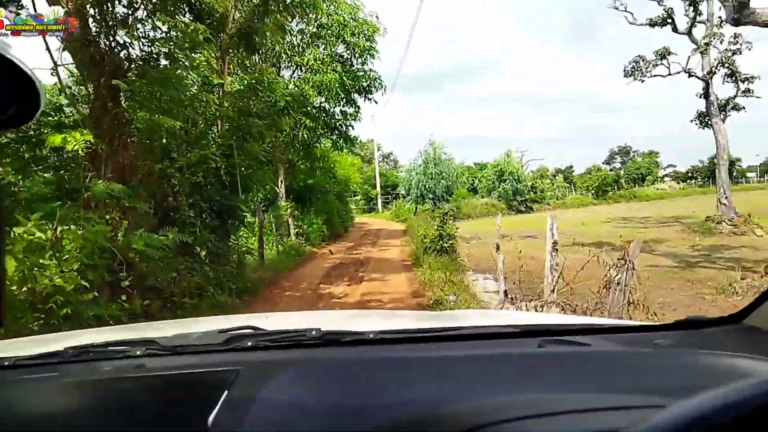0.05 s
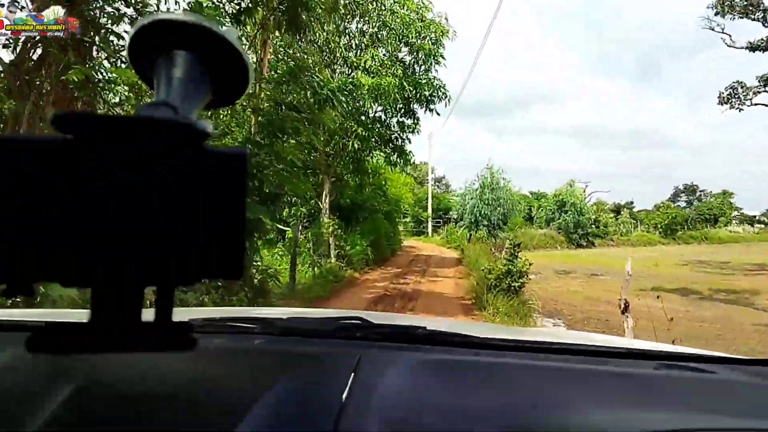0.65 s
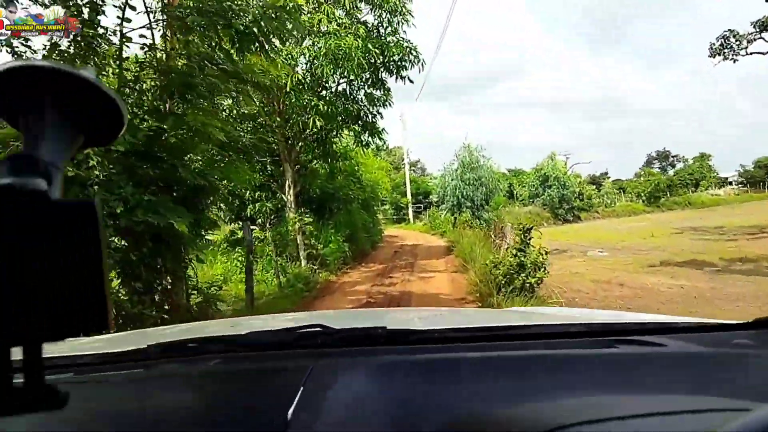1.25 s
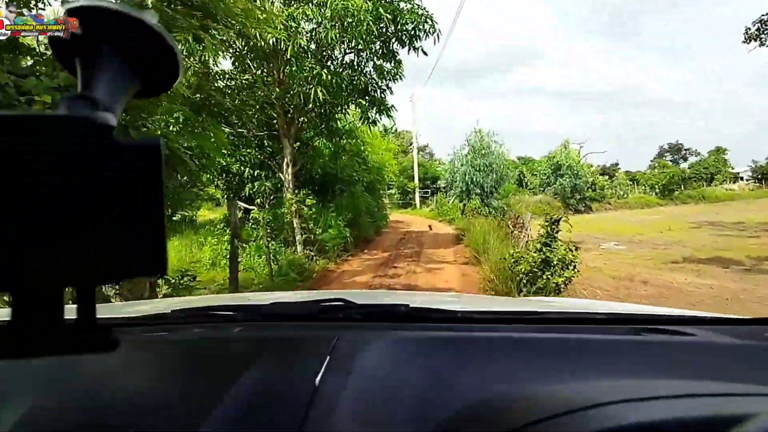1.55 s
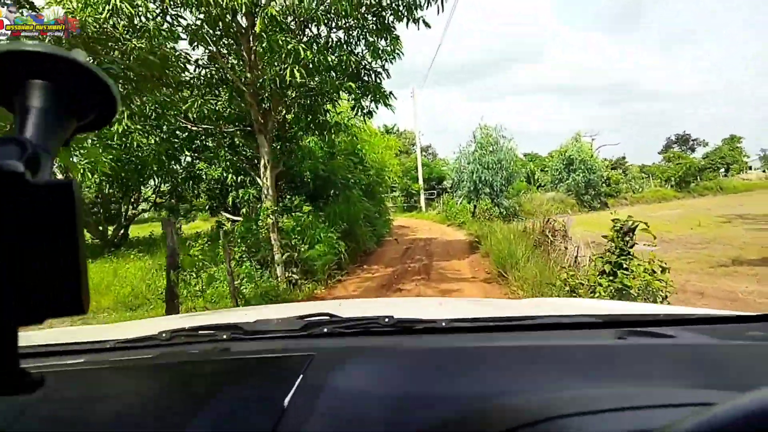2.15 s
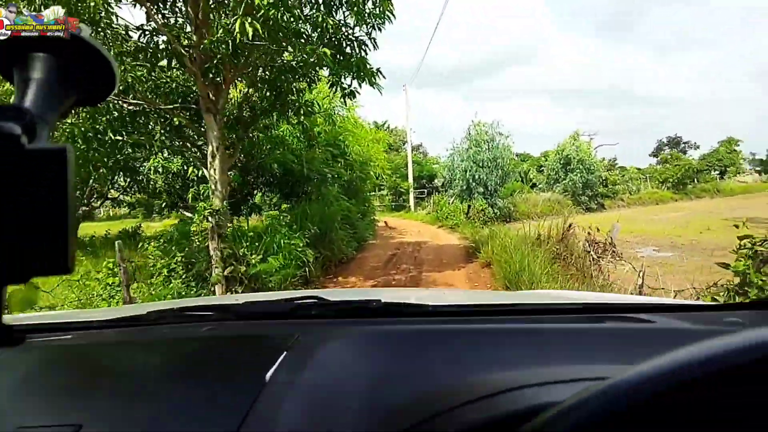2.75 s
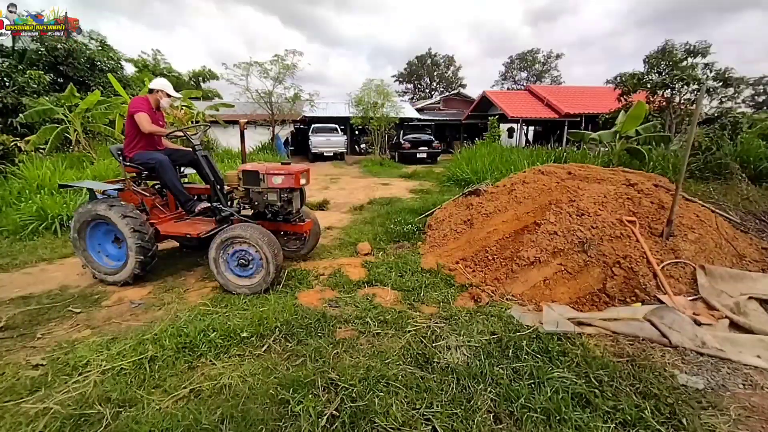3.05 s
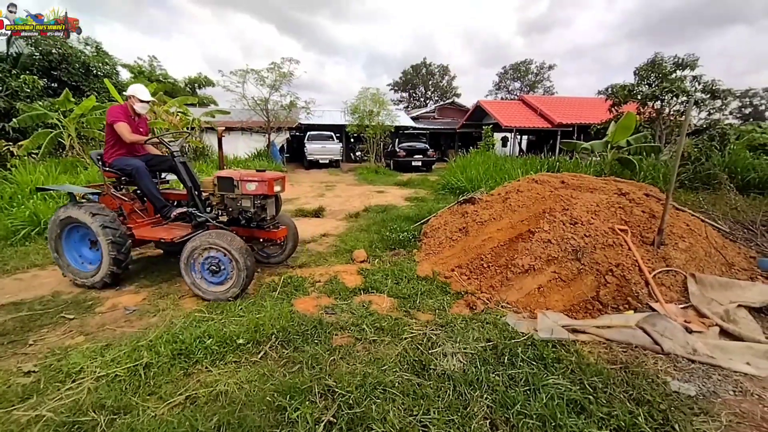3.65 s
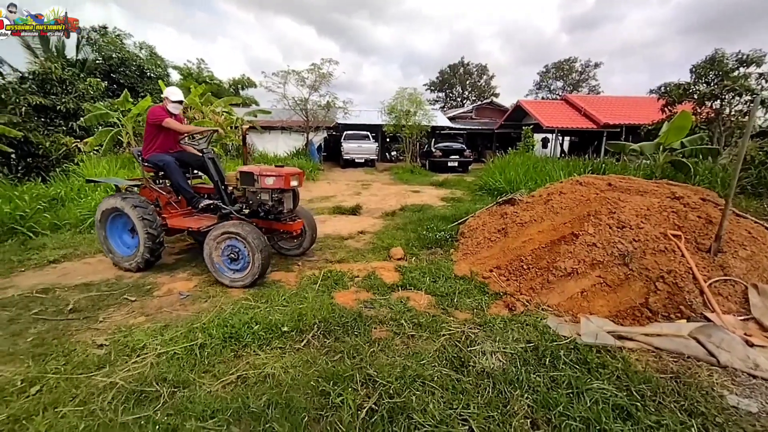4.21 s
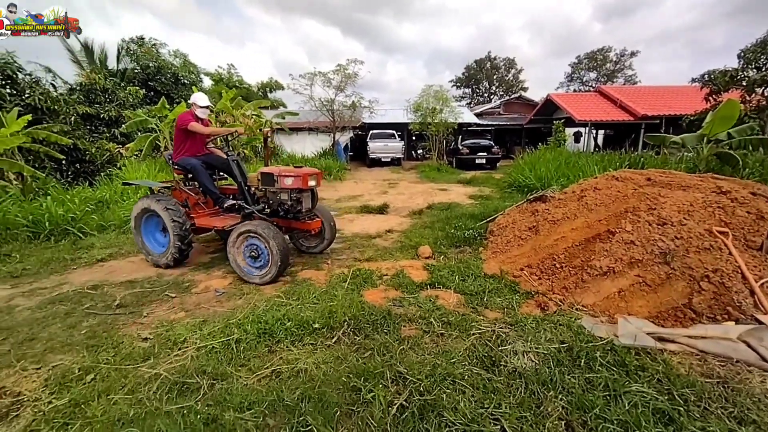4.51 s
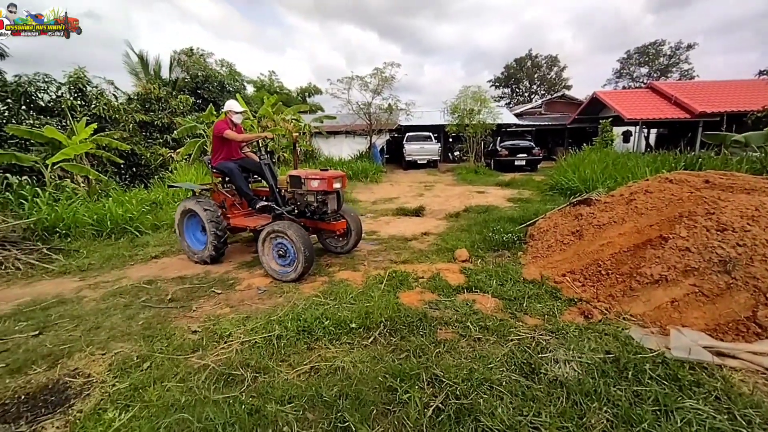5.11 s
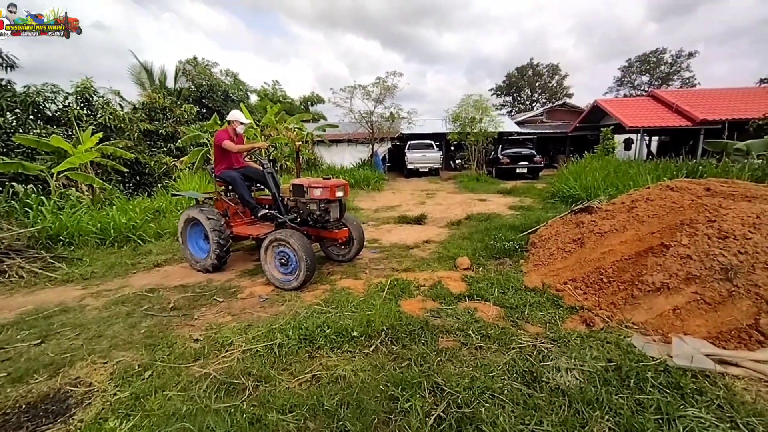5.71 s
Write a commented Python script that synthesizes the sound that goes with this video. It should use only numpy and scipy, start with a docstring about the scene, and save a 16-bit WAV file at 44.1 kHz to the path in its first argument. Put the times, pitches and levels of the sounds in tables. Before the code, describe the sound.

A low rumble inside a car on a dirt road, then a small diesel tractor revs and slows, thudding and rattling.

```python
"""A car ride, then a tractor

Inside a car creeping along a dirt road, the tyres rumble, the engine hums and the trim ticks.
After a short silence, a small one-cylinder diesel tractor revs up and sinks back to idle outdoors.
Each engine cycle brings an exhaust thud, an intake boom, valve clicks and a firing, which knocks
under full throttle. Loose panels rattle, fittings clink and the slipping belt chirps."""
import sys
import numpy as np
from scipy import signal
from scipy.fft import rfft, irfft, next_fast_len
from scipy.io import wavfile
from scipy.ndimage import uniform_filter1d, map_coordinates

SR = 44100
rng = np.random.default_rng(int(sys.argv[2]) if len(sys.argv) > 2 else 0)


def wav_out(sig):
    """Save sig, one row per channel (or a flat mono array), as 16-bit PCM at SR to the path in sys.argv[1]."""
    wavfile.write(sys.argv[1], SR, np.round(np.clip(np.atleast_2d(sig).T, -1, 1) * 32767).astype(np.int16))


N = 258867
CAR_END_S, TRACTOR_START_S, FIRST_EXHAUST_S = 2.724, 3.0, 3.0752

# All levels are relative. The tractor's engine cycles per second: t/s, f/Hz
ENGINE_SPEED = [(3, 5.743), (3.432, 6.233), (3.541, 6.826), (3.967, 7.8), (4.212, 7.703), (4.842, 6.34),
                (5.87, 4.361)]
# Parts grow louder with speed: level/dB at the reference speed, gain/dB per doubling of speed
REFERENCE_SPEED_HZ = 6.5
EXHAUST_LAW, INTAKE_LAW, FIRING_LAW = (-20.5, 6.3), (-27.5, 7.7), (-39, 5.3)
EXHAUST_VALVE_LAW, INTAKE_VALVE_LAW, RASP_LAW = (-32, 8.4), (-33, 1.9), (-28, 7)
RATTLE_LAW, JINGLE_LAW = (-33, 12.2), (-50.5, 14)
# Tones of the air in the silencer: f/Hz, level/dB
SILENCER_TONES = [(170, 0.5), (410, -12.5), (850, -8)]
# Firings under full throttle: t/s, knock level/dB, clank level/dB, shove level/dB
HARD_FIRINGS = [(3.3752, -20.5, -27, -27.5), (3.5305, -19, -24.5, -25.5), (3.6762, -15, -28.5, -23),
                (3.8135, -18, -31, -25), (3.9445, -26, -34, -27), (4.0725, -36, -35, -29)]
# The intake valve slams shut extra hard: t/s, level/dB
VALVE_SLAMS = [(3.331, -27), (5.211, -32)]
# Tone colours of the tractor's noises: f/Hz, level/dB
VALVE_COLOUR = [(500, 12), (2000, 13), (4500, 6), (6600, 10.5), (7500, 5.5), (9200, 12.5), (11000, 1),
                (12500, 4.5), (16000, 1)]
RASP_COLOUR = [(300, -25), (800, 5.5), (1050, 11), (1300, 11.5), (1850, 8), (2400, 1), (4000, -14),
               (8000, -43), (16000, -32)]
KNOCK_COLOUR = [(30, -30), (110, -13), (300, 1.5), (450, 5), (800, 12.5), (1500, 0), (2600, 4.5),
                (3700, -0.5), (5200, -4), (6700, -2), (8000, -4), (10000, -0.5), (16000, -9)]
CHURN_COLOUR = [(25, -37), (40, -43), (56, -13.5), (110, 0.5), (180, -1), (270, -5.5), (400, -9), (640, 0),
                (1000, -7), (2400, -12), (3000, -18.5), (5000, -26.5), (9000, -32.5)]
BELT_COLOUR = [(1500, 13), (3500, 5.5), (5000, 6.5), (6600, 2.5), (7500, 3.5), (9500, 7.5), (11000, 0),
               (12500, 3), (16000, -10.5)]
# Modes, the pitches at which each metal part rings: f/Hz, width/Hz, level/dB
PANEL_MODES = [(480, 70, -13), (625, 110, -2), (800, 74, -7), (930, 43, -4), (1266, 170, -7.5),
               (1760, 55, -17), (2010, 180, -7.5), (2470, 96, -13)]
IRON_MODES = [(1716, 40, -10), (2330, 70, -5), (2550, 88, -7), (3520, 110, 1), (3860, 100, -3),
              (4260, 120, -4), (4700, 120, -7), (5500, 130, -7), (6600, 170, 1), (8650, 250, -6),
              (10030, 300, -8), (11650, 200, -6)]
BONNET_MODES = [(622, 15, -2.5), (647, 33, -5), (760, 14, -7)]
# Piston strokes that shake the bonnet: share of the cycle, level/dB
BONNET_STROKES = [(0, 0), (.28, -9.5), (0.542, 1), (.76, -5.5)]
# How hard the bonnet shakes: t/s, level/dB
BONNET_LEVEL = [(3, -41.5), (3.6, -47), (4.1, -41.5), (4.6, -41.5), (5.1, -40.5), (5.87, -44.5)]
# Clinks of loose fittings: t/s, level/dB, f/Hz
CLINKS = [(3.943, -30, 4230), (3.946, -36, 6640), (3.971, -35, 6620), (4.035, -33, 3400),
          (4.065, -35, 4300), (4.2, -38, 3500), (4.295, -35, 3460), (4.342, -37, 3520), (4.445, -39, 4250),
          (4.684, -39, 4710), (4.956, -42, 4720), (5.0, -41, 4720), (5.299, -44, 4730), (5.349, -42, 3560),
          (5.693, -43, 4650), (5.752, -44, 3570)]
# The belt's hiss: t/s, level/dB
BELT_LEVEL = [(3, -48.5), (3.6, -43.5), (4.0, -40), (4.28, -47.5), (4.8, -48.5), (5.2, -46.5), (5.3, -51.5),
              (5.87, -53.5)]
# Belt chirps: t/s, length/s, start f/Hz, end f/Hz, level/dB, overtone level/dB, waver as share of pitch
BELT_CHIRPS = [(4.161, .016, 9700, 9500, -46, -40, .012), (4.343, .08, 5900, 6550, -47, -14, .018),
               (4.49, .055, 7100, 4950, -49, -4, .022), (4.55, .035, 9500, 10000, -50, -40, .014),
               (4.565, .06, 6150, 5950, -52.5, -2, .012), (4.72, .06, 6700, 4800, -51.5, -6, .025),
               (4.785, .075, 9300, 8900, -51.5, -40, .022), (4.86, .065, 5300, 5750, -54, -14, .02),
               (5.028, .075, 6200, 4750, -53, -3, .016), (5.485, .05, 6050, 6150, -50, -16, .008),
               (5.489, .04, 8850, 9150, -50, -40, .008)]
# How alike left and right sound outdoors: f/Hz, likeness (1 or more means the same)
FIELD_ALIKE = [(130, 1.3), (300, 0.6), (640, 0.85), (1400, 0.4), (3000, .5), (15000, -0.16)]
# How much louder the tractor is on the left: f/Hz, level/dB
LEFT_BOOST = [(150, 0), (600, 0), (1200, 2), (4000, 2), (8000, 3), (14000, 6)]
# How much later it arrives on the right: t/s, delay/ms
RIGHT_DELAY = [(3, 0.24), (5.87, 0.12)]

# The car's ride: t/s, rumble level/dB, gravel level/dB, hum level/dB
RIDE_LEVELS = [(0, -35.5, -65.5, -49.5), (.5, -37, -62, -43.5), (.92, -37.5, -58.5, -40.5),
               (1.1, -37.5, -64, -45.5), (1.3, -37, -62.5, -42.5), (1.8, -36.5, -65, -42.5),
               (2.72, -37, -70, -42)]
# Tone colours of the tyres on the road: f/Hz, level/dB
RUMBLE_COLOUR = [(25, -34), (42, -25), (58, -6.5), (85, -7.5), (140, 1.5), (180, -3.5), (220, -2),
                 (260, -3.5), (355, 0.5), (410, -4), (490, -15.5), (800, -17), (1040, -20.5), (3000, -72)]
GRAVEL_COLOUR = [(600, -30), (1100, -9), (1600, -10), (1900, -6), (2800, -7), (4000, -13), (7000, -19),
                 (9500, -15), (11300, -19), (12200, -16), (16000, -21)]
# Pitches at which the cabin rings: f/Hz, width/Hz, level/dB
CABIN_MODES = [(376, 19, -6), (595, 6.5, -24.5), (686, 49, -10), (768, 26, -14.5), (907, 20, -10.5),
               (1176, 118, -11), (1284, 14, -10.5), (1309, 18, -12), (2767, 22, -24.5)]
# Tones of the car's engine: multiple of the firing rate, level/dB
HUM_TONES = [(1, 2), (4.1, -23.5), (8.09, -18), (9.24, -12)]
# A steady tone in the cabin: t/s, f/Hz, level/dB
CABIN_DRONE = [(0, 354, -42), (.8, 348, -43), (1.1, 347, -43), (1.5, 362, -45), (2.03, 337, -43),
               (2.25, 349, -39.5), (2.5, 347, -39.5), (2.72, 358, -39.5)]
# Ticks of the dashboard trim: t/s, level/dB, f/Hz, width/Hz
TRIM_TICKS = [(.129, -52, 4500, 4000), (.957, -49, 2600, 1400), (1.027, -48, 2150, 400),
              (1.239, -48, 3900, 3500), (1.29, -48, 6500, 7000), (1.319, -49.5, 3600, 3000),
              (1.438, -44.5, 4000, 2000), (1.537, -45.5, 4000, 3000), (2.677, -35.5, 4100, 4500)]
# How alike left and right sound in the cabin: f/Hz, likeness (1 means the same)
CABIN_ALIKE = [(60, 0.62), (130, 0.89), (300, 0.89), (700, 0.26), (1500, 0.39), (6000, 0.038), (15000, 1)]
# How far the right side lags in the cabin: f/Hz, phase/rad
CABIN_LAG = [(60, .1), (150, .25), (430, 0.33), (780, 0.84), (1210, 3.9), (1700, 3.9), (3000, 6.8)]


def tractor():
    """All the tractor's parts together. It stands to the left, so the right side is later and duller."""
    sound = gas_flow() + shove() + crack() + fittings()
    sound += ironwork(cylinder() + rattle() + bonnet() + belt())
    left, right = filtered(sound, lambda hz: amp(np.outer([.5, -.5], along(LEFT_BOOST, hz))))
    delay_ms, = curves(RIGHT_DELAY)
    late = np.arange(N) - delay_ms * SR / 1000
    return np.array([left, map_coordinates(right, [late], order=5)])


def gas_flow():
    """Each puff of exhaust swings the silencer's air; about a quarter cycle later the intake booms."""
    t = clock(SR // 3)
    low, *upper = [-amp(db) * sine(hz, t - .0012) for hz, db in SILENCER_TONES]
    puff = arch(t, length=.013) * low + arch(t, length=.02) * sum(upper)
    ring = amp(-14) * swell(t, rise=.012, t60=.18) * sine(210, t)
    boom = swell(t, rise=.0043, t60=.17) * sine(165, t)
    boom += amp(-11) * swell(t, rise=.0022, t60=.037) * sine(108, t)
    exhaust = repeat(stroke(0) + .00207, loudness(EXHAUST_LAW, stroke(0)), puff + ring)
    return exhaust + each_cycle(.275, INTAKE_LAW, boom)


def cylinder():
    """Valves click open, the intake shuts with a rasp, and hard firings knock and set the panels ringing."""
    t = clock(SR // 3)
    valves = each_cycle(0, EXHAUST_VALVE_LAW, swell(t, rise=.00075, t60=.047))
    valves += each_cycle(.265, INTAKE_VALVE_LAW, swell(t, rise=.0027, t60=.032))
    rasp = each_cycle(.49, RASP_LAW, swell(t, rise=.006, t60=.1))
    rasp += repeat(*np.transpose(VALVE_SLAMS), swell(t, rise=.002, t60=.06))
    knock, clank = np.zeros((2, N))
    for s, knock_db, clank_db, _ in HARD_FIRINGS:
        age = clock() - s
        peak = np.exp(-np.abs(age / .003) ** 1.5)
        shudder = amp(-17.5) * swell(age + .01, rise=.008, t60=.14)
        knock += amp(knock_db) * (peak + shudder)
        clank += amp(clank_db) * swell(age + .0041, rise=.0044, t60=.13)
    panels = shaped_noise(lambda f: resonances(PANEL_MODES, f), FIELD_ALIKE)
    return (valves * noise(VALVE_COLOUR, FIELD_ALIKE) + rasp * noise(RASP_COLOUR, FIELD_ALIKE)
            + knock * noise(KNOCK_COLOUR, FIELD_ALIKE) + clank * panels)


def shove(jolt_hz=103, lead_s=.0096):
    """Each firing shoves the whole frame into a short, deep swing, far harder under throttle."""
    t = clock(SR // 8)
    swing = arch(t, 1.53 / jolt_hz) ** .5 * sine(jolt_hz, t)
    swing += amp(-27) * swell(t, rise=.03, t60=.17) * sine(85, t)  # the frame rocks on
    hard, _, _, hard_db = np.transpose(HARD_FIRINGS)
    light = stroke(.741)
    light = light[(light < hard[0] - .05) | (light > hard[-1] + .05)]
    return repeat(hard - lead_s, hard_db, swing) + repeat(light, loudness(FIRING_LAW, light), swing)


def crack(slap_lead_s=.0085, strike_lead_s=.0015):
    """At each hard firing the piston slaps the cylinder wall, then the engine block barks and rings."""
    out, t = np.zeros((2, N)), clock(SR // 12)

    def thump(db, hz, t60):
        return amp(db) * swell(t, rise=.0015, t60=t60) * sine(hz * rng.normal(1, .06), t)

    for s, knock_db, clank_db, _ in HARD_FIRINGS:
        slap = thump(clank_db + 8, hz=620, t60=.022)
        ring = amp(knock_db - 10.5) * iron_ring(t)
        bark = thump(clank_db + 8.5, hz=900, t60=.04)
        add_at(out, s - slap_lead_s, slap)
        add_at(out, s - strike_lead_s, ring + bark)
    return out


def iron_ring(t, attack_s=.00063):
    """The block is struck once: each mode rings out, with a random level and phase on each side."""
    ring = 0
    for hz, width, db in IRON_MODES:
        envelope = amp(db + rng.normal(0, 2, (2, 1))) * np.exp(-np.pi * width * t)
        turns = hz * t + rng.random() + rng.random((2, 1)) / 4
        ring += envelope * np.sin(2 * np.pi * turns)
    return (1 - np.exp(-t / attack_s)) * ring


def ironwork(x, shimmer_db=-7, t60=.076):
    """The block and its covers add narrow rings and a brief, bright shimmer to the sound x."""
    t = clock(SR // 8)
    tail = np.diff(rng.standard_normal((2, len(t))), prepend=0) * amp(-60 * t / t60)
    tail = signal.lfilter([1], [1, -np.exp(-2 * np.pi * 900 / SR)], tail)  # no shimmer in the bass
    shimmer = signal.oaconvolve(x, tail / np.linalg.norm(tail[0]), axes=1)[:, :N]
    return amp(-1.1) * filtered(x + amp(shimmer_db) * shimmer, lambda f: 1 + resonances(IRON_MODES, f))


def rattle():
    """Loose panels ring under many small, blunt hits, over the churn of gears and fan."""
    level_db = loudness(RATTLE_LAW, clock())
    hits = random_hits(per_s=420, spread_db=3)
    panels = stereo(hits, lambda f: resonances(PANEL_MODES, f) / (1 + 1j * f / 2800) ** 2, FIELD_ALIKE)
    churn = amp(level_db - 3 + 2.4 * wobble(70)) * noise(CHURN_COLOUR, FIELD_ALIKE)
    return amp(level_db - 5.5) * panels + churn


def bonnet():
    """Each stroke of the piston shakes the bonnet, and its ring dies away in between."""
    level_db, = curves(BONNET_LEVEL)
    shake = swell(clock(SR // 3), rise=.005, t60=.15)
    shakes = np.zeros(N)
    for share, db in BONNET_STROKES:
        times = stroke(share)
        shakes += repeat(times, rng.normal(db, 1.2, len(times)), shake)
    centre_hz = BONNET_MODES[1][0]
    response = lambda f: resonances(BONNET_MODES, f) / (1 + ((f - centre_hz) / 170) ** 4)
    ring = shaped_noise(response, FIELD_ALIKE)
    power = np.abs(uniform_filter1d((ring ** 2).mean(0), size=1300))
    ring /= np.sqrt(power + .055)  # so equal strokes ring about equally hard
    return amp(level_db) * unit(shakes) * ring


def fittings():
    """Loose metal fittings bounce and jingle at random; now and then one clinks clearly."""
    hits = random_hits(per_s=110, spread_db=4)
    bounces = [signal.oaconvolve(side, rng.standard_normal(130) * np.hanning(130))[:N] for side in hits]
    jingle = stereo(bounces, lambda f: resonances(IRON_MODES, f) / (1 + (f / 5200) ** 6), FIELD_ALIKE)
    out = amp(loudness(JINGLE_LAW, clock())) * jingle
    t = clock(SR // 8)
    for s, db, hz in CLINKS:
        drift = np.cumsum(rng.normal(0, .13, (2, len(t))), axis=1)
        add_at(out, s, amp(db) * swell(t, rise=.001, t60=.12) * np.sin(2 * np.pi * hz * t + drift))
    return out


def belt(scrape_s=5.467, overtone_ratio=1.96, tail_db=-5, tail_fall=.16, tail_waver=.075):
    """The belt rubs on its pulleys and chirps as it slips; each chirp sags roughly as the grip fails."""
    hiss_db, = curves(BELT_LEVEL)
    rubbing = amp(hiss_db) + amp(-38.5) * swell(clock() - scrape_s, rise=.0034, t60=.16)
    chirps = np.zeros(N)
    waver, grip = wobble(1500), amp(4 * wobble(400))  # an uneven grip roughens each chirp
    for s, length, start_hz, end_hz, db, overtone_db, scatter in BELT_CHIRPS:
        t = clock(int(2 * length * SR))  # the chirp and an equally long tail
        span = slice(int(s * SR), int(s * SR) + len(t))
        glide_hz = end_hz + (start_hz - end_hz) * np.clip(1 - t / length, 0, 1) ** 1.5
        failing = np.clip(t / length - .8, 0, 1)
        roughness = (scatter + tail_waver * failing ** .5) * waver[span]
        phase = phase_of(glide_hz * (1 - tail_fall * failing) * (1 + roughness))
        squeal = np.sin(phase) + amp(overtone_db) * np.sin(overtone_ratio * phase)
        envelope = grip[span] * np.maximum(arch(t, length), amp(tail_db) * arch(t, t[-1]))
        chirps[span] += amp(db + 6.5) * envelope * squeal
        rubbing[span] += amp(db - 3) * envelope
    return rubbing * amp(.7 + 3.5 * wobble(90)) * noise(BELT_COLOUR, FIELD_ALIKE) + chirps


def car():
    """Everything heard in the cabin, a little louder and later on the right."""
    rumble_db, gravel_db, hum_db = curves(RIDE_LEVELS)
    sound = tyres(rumble_db, gravel_db) + engine_hum(hum_db) + rut() + drone() + trim()
    sides = lambda f: amp([[-.5], [.5]]) * np.exp(1j * np.outer([.5, -.5], along(CABIN_LAG, f)))
    return filtered(sound, sides)


def tyres(rumble_db, gravel_db):
    """The tyres rumble through the body and make the cabin boom, while gravel hisses."""
    rumble = amp(rumble_db - 2 + .48 * wobble(14.9)) * noise(RUMBLE_COLOUR, CABIN_ALIKE)
    boom = shaped_noise(lambda f: resonances(CABIN_MODES, f), CABIN_ALIKE)
    boom *= amp(rumble_db - 11.5 + .48 * wobble(6.34))
    gravel = amp(gravel_db + 1.4 + 1.6 * wobble(40)) * noise(GRAVEL_COLOUR, CABIN_ALIKE)
    return rumble + boom + gravel


def engine_hum(level_db, firing_hz=145.8, wander_db=1.8):
    """The car's engine hums at its firing rate, with a few fainter tones above."""
    phase = phase_of(firing_hz * (1 + .007 * wobble(7)))
    return sum(amp(level_db + db + wander_db * wobble(8.97)) * np.sin(k * phase) for k, db in HUM_TONES)


def rut(at_s=1.291, hz=125):
    """A wheel drops into a rut with one low thump."""
    t = clock() - at_s
    return amp(-27) * swell(t, rise=.0048, t60=.04) * sine(hz, t)


def drone():
    """One clean, slightly unsteady tone stands out of the rumble."""
    hz, db = curves(CABIN_DRONE)
    phase = phase_of(hz * (1 + .012 * wobble(22)))
    return amp(db + 1.8 * wobble(12)) * np.sin(phase)


def trim():
    """Each loose bit of trim ticks briefly at its own pitch."""
    out = np.zeros((2, N))
    for s, db, hz, width in TRIM_TICKS:
        ring = shaped_noise(lambda f: resonances([(hz, width, 0)], f) ** 2, CABIN_ALIKE)
        out += amp(db) * swell(clock() - s, rise=.0015, t60=.016) * ring
    return out


def stroke(share):
    """The times when this share of each engine cycle has passed; 0 is the exhaust valve opening."""
    speed, = curves(ENGINE_SPEED)
    cycles = np.cumsum(speed) / SR
    cycles -= np.interp(FIRST_EXHAUST_S, clock(), cycles)
    return np.interp(np.arange(share, cycles[-1], 1), cycles, clock())


def loudness(law, times):
    """A part's level in dB at these times, from the engine's speed."""
    db, db_per_doubling = law
    speed = np.interp(times, *np.transpose(ENGINE_SPEED))
    return db + db_per_doubling * np.log2(speed / REFERENCE_SPEED_HZ)


def each_cycle(share, law, shape):
    """A shape played at this share of every cycle, louder with speed."""
    times = stroke(share)
    return repeat(times, loudness(law, times), shape)


def repeat(times, dbs, shape):
    """A copy of shape at each time, at its own level."""
    blows = np.bincount(np.round(times * SR).astype(int), amp(dbs), N)[:N]
    return signal.oaconvolve(blows, shape)[:N]


def add_at(out, s, sound):
    """Mix a sound into out, starting at s seconds."""
    start = int(s * SR)
    out[:, start:start + sound.shape[-1]] += sound[..., :N - start]


def random_hits(per_s, spread_db):
    """Stereo clicks at random times and strengths."""
    hits = (rng.random(N) < per_s / SR) * amp(spread_db * rng.standard_normal(N))
    return hits * rng.choice([-1, 1], (2, N))


def noise(colour, alike):
    """Stereo noise with the tone colour of a table."""
    return shaped_noise(lambda hz: amp(along(colour, hz)), alike)


def shaped_noise(response, alike):
    """Stereo white noise sent through a filter."""
    return stereo(rng.standard_normal((2, N)), response, alike)


def stereo(x, response, alike):
    """Filter two unrelated signals and blend them to a given left-right likeness, at rms 1."""
    angle = lambda hz: np.arccos(np.clip(along(alike, hz), -1, 1)) / 2
    mid, side = filtered(x, lambda hz: response(hz) * np.array([np.cos(angle(hz)), np.sin(angle(hz))]))
    return unit(np.array([mid + side, mid - side]))


def resonances(modes, f):
    """The filter response of something that rings at these modes."""
    return sum(amp(db) * 1j * f * width / (hz * hz - f * f + 1j * f * width) for hz, width, db in modes)


def filtered(x, response):
    """Multiply each frequency in x by response(hz)."""
    size = next_fast_len(N + SR // 2)
    return irfft(rfft(x, size) * response(np.fft.rfftfreq(size, 1 / SR)), size)[..., :N]


def swell(t, rise, t60):
    """Rise to 1 in rise seconds, then fade by 60 dB every t60 seconds."""
    return np.clip(t / rise, 0, 1) ** 2 * amp(-60 * np.maximum(t - rise, 0) / t60)


def arch(t, length):
    """One hump of a sine wave."""
    return np.sin(np.pi * np.clip(t / length, 0, 1))


def wobble(rate):
    """A smooth curve through rate random points a second."""
    return map_coordinates(rng.standard_normal(int(N * rate / SR) + 4), [clock() * rate])


def curves(rows):
    """One value per sample for each column after the time."""
    times, *columns = np.transpose(rows)
    return [np.interp(clock(), times, column) for column in columns]


def along(points, hz):
    """Look up a table of f/Hz, value on a log frequency scale."""
    f, values = np.transpose(points)
    return np.interp(np.log(hz + 1), np.log(f + 1), values)


def sine(hz, t):
    """A pure, steady tone."""
    return np.sin(2 * np.pi * hz * t)


def phase_of(hz):
    """The running phase of a changing pitch."""
    return 2 * np.pi * np.cumsum(hz) / SR


def amp(db):
    """Turn decibels into a gain."""
    return 10 ** (np.asarray(db) / 20)


def unit(x):
    """Scale x to an average strength (rms) of 1."""
    return x / np.sqrt(np.mean(x ** 2) + 1e-20)


def clock(samples=N):
    """The time of each sample in seconds."""
    return np.arange(samples) / SR


def scene():
    """First the car, then silence, then the tractor."""
    t = clock()
    fade_in = np.clip((t - TRACTOR_START_S) / .0045, 0, 1)
    return car() * (t < CAR_END_S) + tractor() * fade_in


def record(dry, bottom_hz=42, top_hz=15950):
    """Cut away the deepest bass and the highest treble."""
    thinned = signal.sosfilt(signal.butter(3, bottom_hz, "highpass", fs=SR, output="sos"), dry)
    return filtered(thinned, lambda hz: np.clip((top_hz - hz) / 200 + .5, 0, 1))


dry = scene()
out = record(dry)
wav_out(out)
```